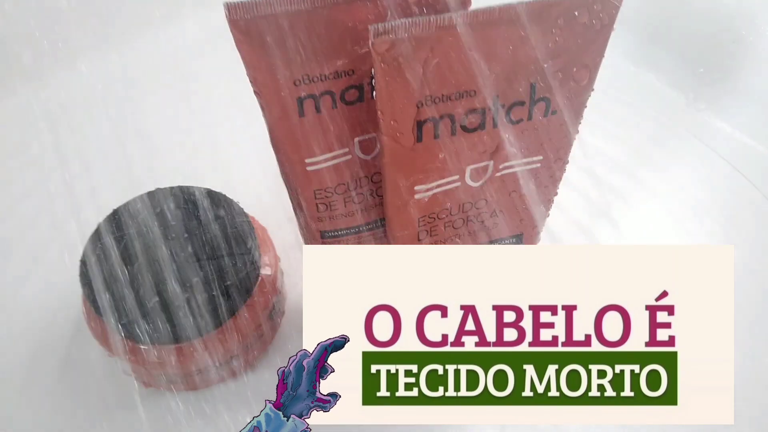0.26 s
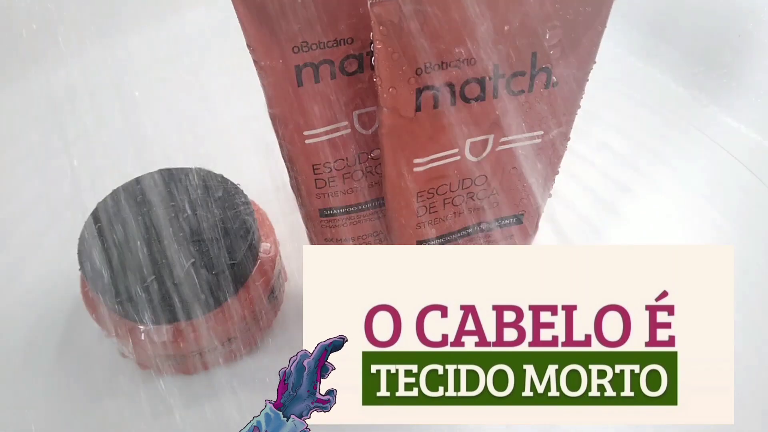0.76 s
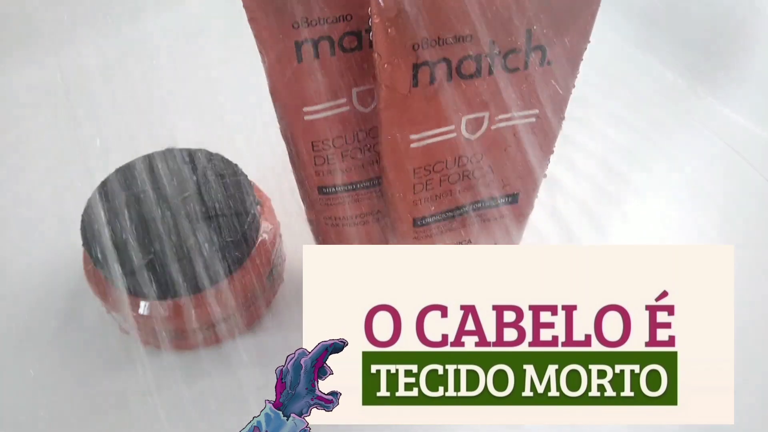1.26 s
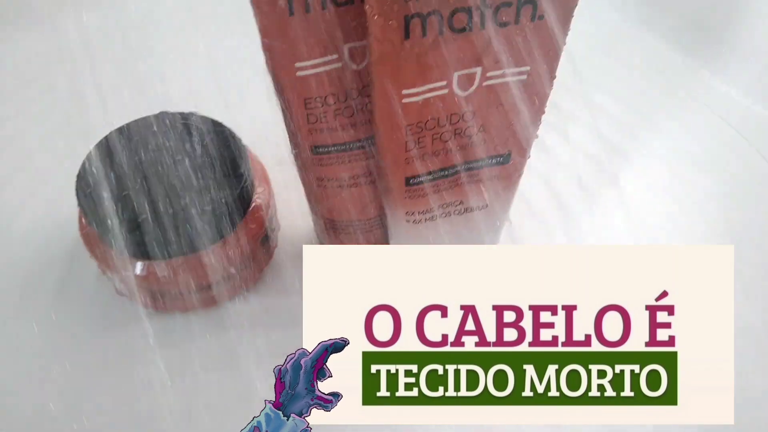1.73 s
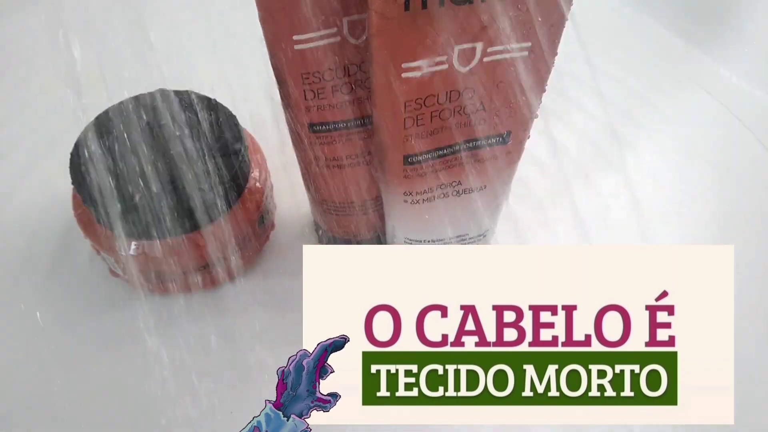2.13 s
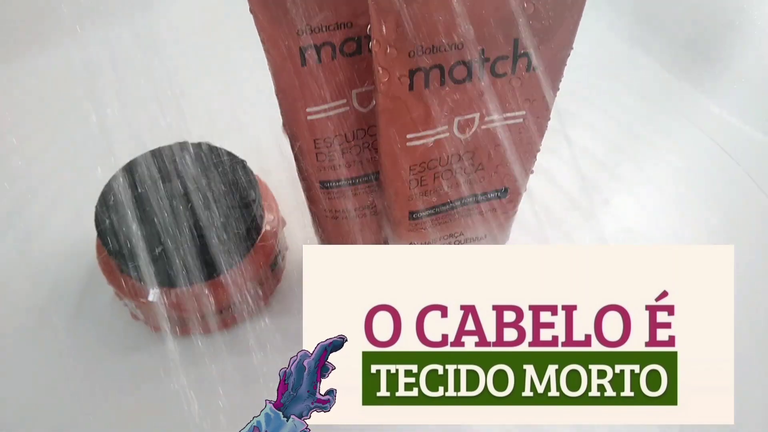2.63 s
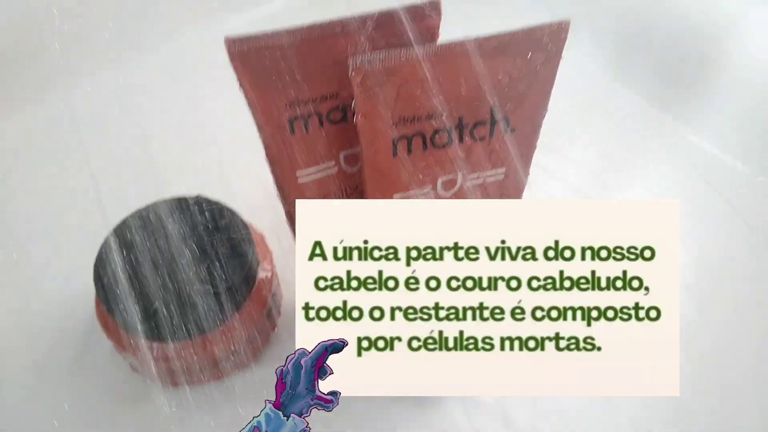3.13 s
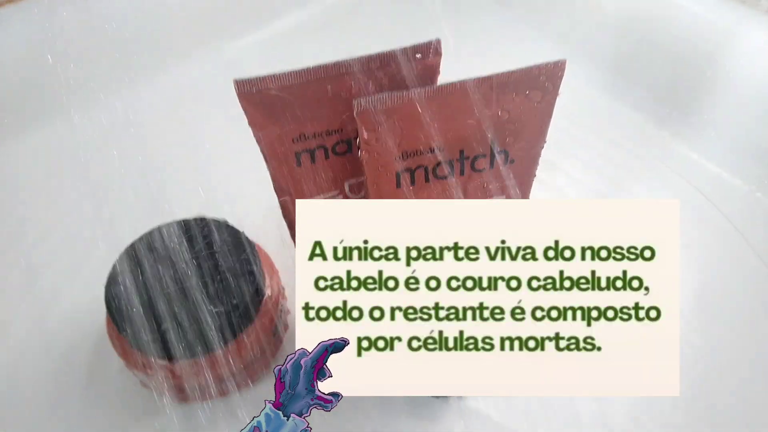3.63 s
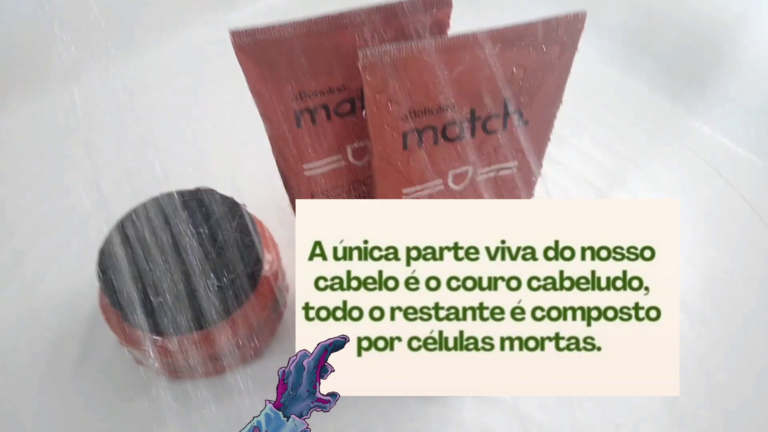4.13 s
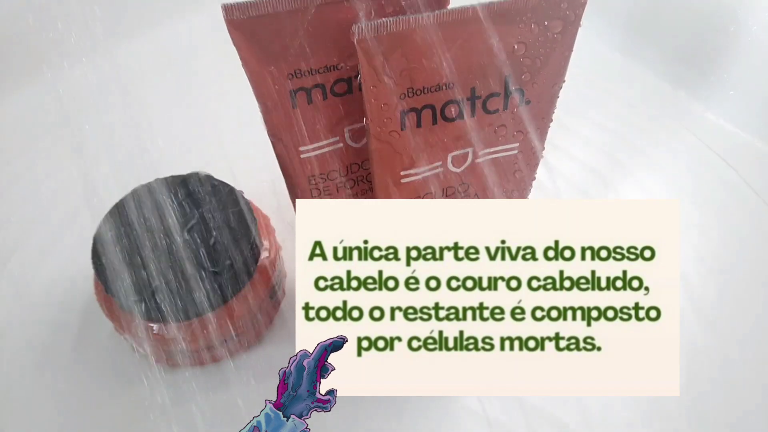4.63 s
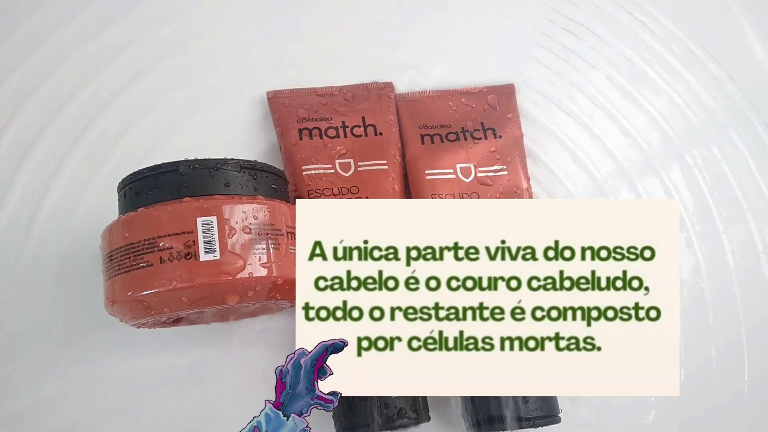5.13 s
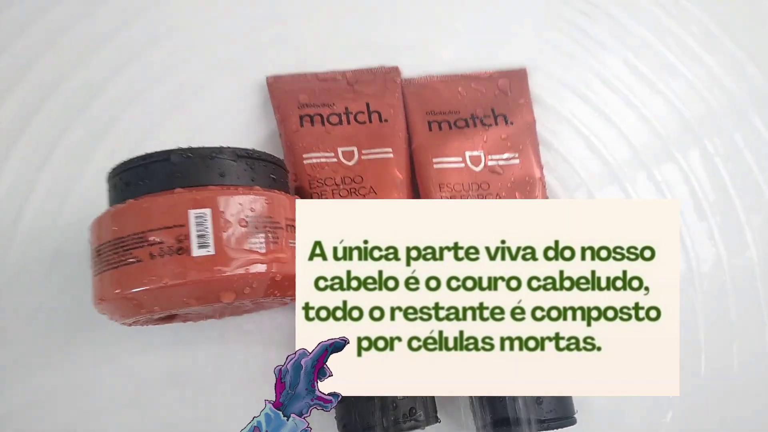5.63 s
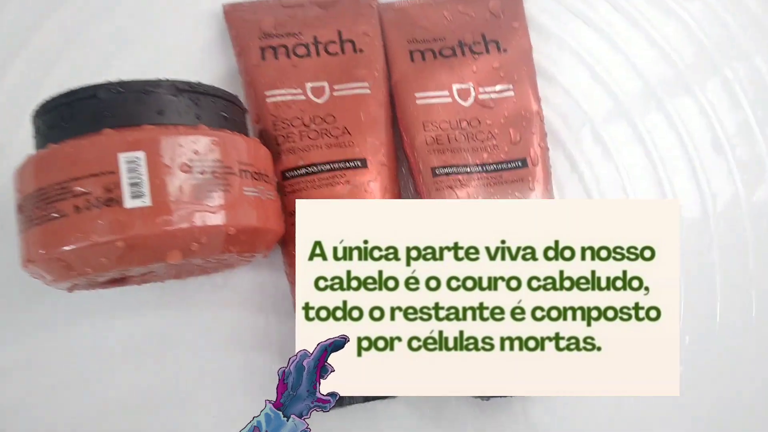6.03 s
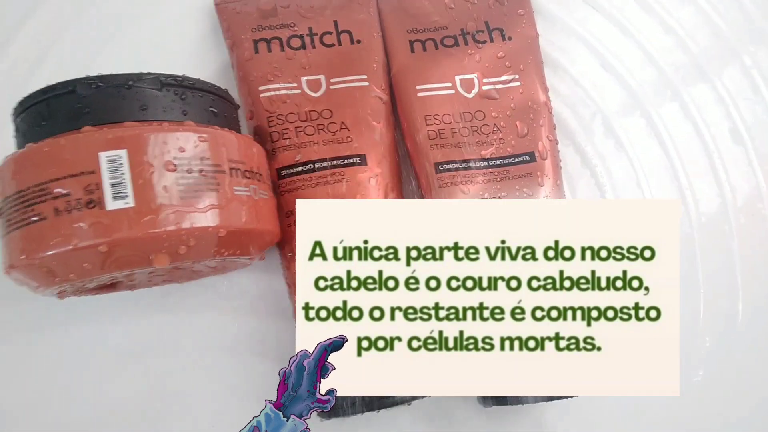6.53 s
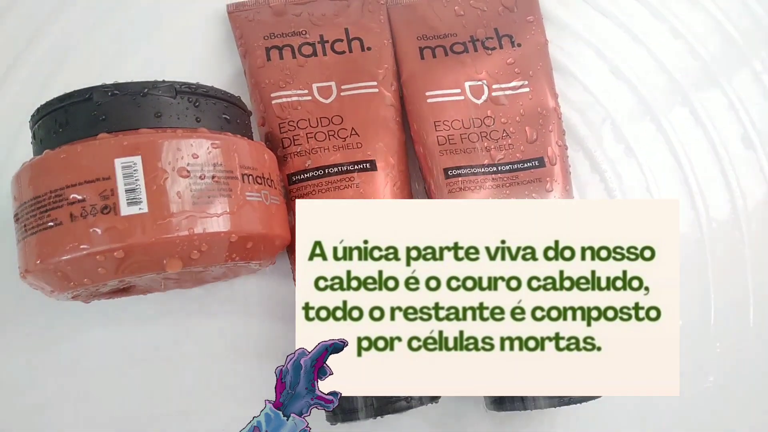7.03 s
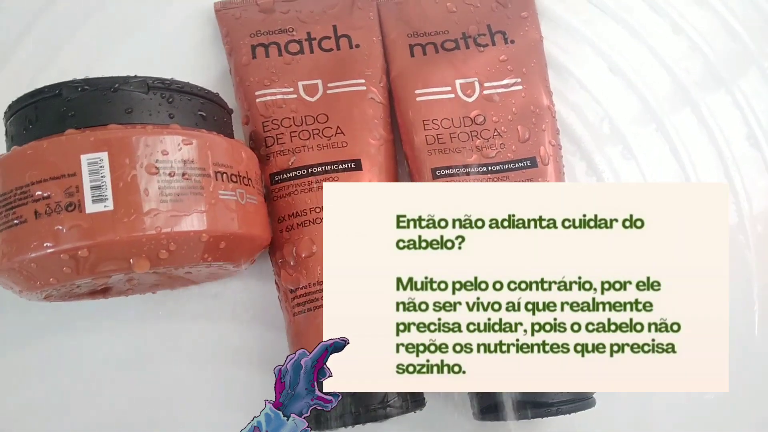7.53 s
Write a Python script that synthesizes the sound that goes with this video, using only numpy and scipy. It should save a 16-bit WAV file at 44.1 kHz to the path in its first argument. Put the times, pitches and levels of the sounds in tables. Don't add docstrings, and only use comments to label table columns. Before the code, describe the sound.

Steady near shower water with bright ticking droplets, a short dead gap, then farther high hiss fading in, sparse drips, faint hum and a soft bump.

```python
import sys
import numpy as np
from scipy import signal
from scipy.fft import rfft, irfft, next_fast_len
from scipy.io import wavfile
from scipy.ndimage import uniform_filter1d, map_coordinates

SR = 44100
rng = np.random.default_rng(int(sys.argv[2]) if len(sys.argv) > 2 else 0)


def ratio(d):
    e = np.asarray(d, float) / 20
    return 10 ** e


def dump(signal):
    limited = np.clip(np.atleast_2d(signal).T, -1, 1)
    pcm = np.round(limited * 32767).astype(np.int16)
    wavfile.write(sys.argv[1], SR, pcm)


N = 342216
TIME = np.arange(N) / SR
STOP_S, START_S = 4.8345, 5.1922
PORTS = np.array([[1], [-1]])

# (t/s, peak level/dB, f/Hz, splash level/dB)
SMALL_DROPS = [(0.025, -29.5, 7640, -13), (0.1277, -25.5, 7760, -6), (0.2488, -26, 7600, -6.5),
               (0.2985, -23, 7170, -6), (0.3723, -19, 7870, -4.5), (0.4471, -24.5, 7660, -15),
               (0.318, -32, 7200, -14.5), (0.615, -34.5, 7400, -14), (2.066, -32, 6800, -15),
               (2.129, -38.5, 6000, -12), (3.074, -35, 7200, -14.5), (0.6943, -22.5, 7350, -9),
               (0.756, -30.5, 7660, -12.5), (1.0648, -32, 7340, -11), (1.5828, -36, 7700, -3.5),
               (1.705, -32.5, 5260, -21), (1.722, -34, 7260, -10), (1.758, -30.5, 7800, -8.5),
               (1.893, -27, 7000, -12), (1.917, -28, 6670, -3), (2.0322, -25, 8300, -11),
               (2.2426, -34, 7260, -8), (2.67, -32.5, 8600, -20), (2.706, -33.5, 7700, -15),
               (2.737, -24, 7770, -7), (2.983, -36.5, 6860, -7), (3.447, -27.5, 7300, -14.5),
               (3.465, -29, 6300, 4), (3.4655, -24, 5370, -11), (3.4667, -34, 9370, -7),
               (3.4657, -35, 4500, -8), (3.4706, -27.5, 7000, -4.5), (0.377, -28.5, 6900, -9),
               (3.479, -34, 5600, -9), (3.5952, -29.5, 7600, -9), (3.705, -33.5, 7350, -12.5),
               (4.047, -31.5, 6600, -11), (4.0696, -34.5, 6600, -12), (4.4533, -30, 8120, -12),
               (4.472, -30, 7050, -9), (4.813, -31, 7600, -6.5)]
# (t/s, peak level/dB, f/Hz)
PUDDLE_PLINKS = [(0.1211, -40, 2150), (0.1665, -34, 3300), (0.7731, -39, 3440), (0.8138, -28.5, 2070),
                 (0.977, -32, 2650), (1.0171, -33, 2800), (1.1075, -34, 2880), (1.3718, -36.5, 2400),
                 (1.6771, -31.5, 2900), (2.0136, -34.5, 2110), (2.0911, -36, 3070), (2.2, -29.5, 1980),
                 (2.3215, -32.5, 2730), (2.387, -38, 3470), (2.4284, -38, 2900), (2.7302, -37, 3360),
                 (3.0994, -38.5, 3000), (3.1497, -35, 2040), (3.3912, -36, 3390), (3.4635, -39.5, 4260),
                 (3.5189, -32, 1890), (3.703, -37, 2640), (3.9584, -35, 3070), (4.4887, -34, 3120)]
# (t/s, peak level/dB, f/Hz)
LATE_DRIPS = [(5.221, -53, 4640), (5.415, -40.5, 1610), (5.416, -40, 2700), (5.419, -51, 1080),
              (5.4522, -39.5, 5800), (5.6557, -44, 7050), (5.911, -45, 2510), (5.946, -40.5, 4440),
              (6.107, -30.5, 4000), (6.37, -54, 2870), (6.434, -39.5, 6250), (6.484, -37.5, 7240),
              (6.669, -39, 6100), (6.798, -29.5, 6750), (6.932, -40, 6470), (7.1768, -31.5, 4280),
              (7.275, -41, 2990), (7.353, -44, 2717), (7.4555, -50, 3580), (7.469, -33, 7600),
              (7.498, -44, 3820), (7.5316, -41, 3700), (7.6266, -50, 6000), (7.673, -35.5, 7540)]
# (t/s, peak level/dB, f/Hz)
LATE_BUBBLES = [(5.96, -35, 3080), (6.6325, -32.5, 3040), (5.93, -42, 2470), (6.6994, -41, 3770),
                (6.7838, -33, 3740), (7.1606, -39, 2830), (7.6266, -41, 3100), (7.633, -43, 2500),
                (7.716, -56, 5200), (7.354, -52, 5000), (6.367, -55, 6500)]
# (t/s, peak level/dB, left-right level/dB)
FINE_SPLASHES = [(0.105, -39, -3), (0.1965, -36.5, -2.5), (0.347, -33, -2), (0.56, -40.5, -2),
                 (0.641, -37, 1.5), (0.894, -40.5, 3), (0.991, -35.5, -1), (1.1237, -35, 1),
                 (1.2146, -39.5, -5), (1.456, -33.5, -1), (1.6846, -42, -8.5), (1.838, -41, -2.5),
                 (1.9325, -44, -6), (2.143, -42.5, -6), (2.384, -40.5, 5), (2.415, -33.5, 2),
                 (2.431, -40, 0), (2.495, -34, -0.5), (2.61, -35, 2), (3.1167, -33, -2), (3.312, -36.5, 0),
                 (3.519, -43.5, 8), (3.6436, -39, -4), (3.7075, -32, 0), (4.0991, -44.5, -8),
                 (4.3098, -38, -3.5), (4.4107, -42, -3.5), (4.56, -44.5, 1), (6.513, -40, -4),
                 (6.6278, -41, -2)]
# (t/s, peak level/dB, left-right level/dB)
FAINT_SPLASHES = [(0.0334, -33.5, 0), (0.3174, -53, -4.5), (0.6269, -51, -3), (0.7725, -49, -2.0),
                  (0.794, -44, -4.0), (0.8139, -42, 2), (0.8788, -49, -1), (0.9347, -40, -1),
                  (1.0389, -43, -1), (1.1068, -43, 4), (1.3328, -52, -6.5), (1.3457, -46, -10),
                  (1.4385, -44, 0), (1.5822, -33, -3.5), (1.6705, -39, -1), (2.2412, -33, -1),
                  (2.352, -40, -1), (2.562, -47, -4), (2.5969, -43, -5), (2.7047, -29, 0),
                  (2.8378, -45, -5), (2.9326, -47, -5.5), (3.0125, -43, -3), (3.0598, -47, -4.5),
                  (3.0988, -41, -2), (3.1324, -39, -5.0), (3.1474, -44, 0), (3.3726, -48, -7),
                  (3.4076, -43, 3), (3.4415, -30.5, 3), (3.5572, -42, -1), (3.7827, -47, -4.5),
                  (3.8012, -48.5, -5.5), (3.8635, -46.5, -6), (3.9563, -50, -1.5), (3.9708, -42, -8.0),
                  (4.0082, -49.5, -7), (4.0361, -40.5, -6.0), (4.069, -31, -6), (4.1703, -49, -6.5),
                  (4.2646, -41, -4), (4.5056, -40.5, -7), (4.54, -42.5, -5), (4.5899, -39.5, 3.5),
                  (4.7021, -50, -5.0), (5.9184, -52, -4.5), (6.1005, -47, -2), (6.315, -47, -5),
                  (6.4837, -45, -7), (6.8044, -50, -3), (6.9441, -47.5, -6), (7.1402, -42, -9),
                  (7.2614, -52, -7), (7.414, -43, -4.5)]
# (t/s, peak level/dB, left-right level/dB)
BURSTING_DROPLETS = [(0.2014, -44, 5), (0.2957, -44.5, 1.0), (0.3466, -41.5, 8), (0.3711, -49.5, 3.0),
                     (0.4579, -42, 5.5), (0.5611, -51, 4.5), (0.6275, -46.5, 1.5), (0.7736, -42.5, 4.5),
                     (0.8804, -49.5, 1), (0.8934, -39, 2.5), (0.9812, -44, 0.5), (1.0331, -49.5, 3),
                     (1.1228, -42.5, 1), (1.1648, -41.5, 1), (1.2072, -45, 3), (1.3334, -43, 0.5),
                     (1.4401, -50, 2), (1.4551, -45.5, 1), (1.5589, -49, 3.5), (1.5828, -49, 4.0),
                     (1.6696, -50.5, 2.0), (1.7564, -45, 0), (1.7814, -40, 2), (1.8696, -47, 3.0),
                     (1.917, -52.5, 2.0), (2.0328, -39.5, 4.5), (2.2428, -46, 3), (2.3531, -52, 1.0),
                     (2.3835, -47.5, 1), (2.4144, -36.5, 3.5), (2.4314, -43, 1), (2.4947, -44.5, 1.5),
                     (2.597, -47.5, 1.5), (2.6918, -54, 1.5), (2.7053, -47, -1.0), (2.7581, -52, 2),
                     (2.9497, -49, 3.0), (3.0994, -46, 0.5), (3.1168, -45.5, -1.5), (3.1637, -46.5, 6.5),
                     (3.311, -40, 2), (3.3742, -47, 5.5), (3.4979, -50.5, 5), (3.5184, -45, 4.0),
                     (3.6282, -51, 5), (3.707, -35.5, 3), (3.8043, -50, 4.0), (3.8641, -46, 7),
                     (4.0497, -50.5, 1), (4.0701, -49, 0.5), (4.1574, -51.5, 5), (4.1739, -50, 6.5),
                     (4.2652, -44, -1), (4.3091, -39.5, -1), (4.4543, -43, 6), (4.5401, -47.5, 3),
                     (4.5605, -44, 10), (4.5905, -46, 7), (6.6268, -50, 0), (7.2609, -47.5, 2)]
# (f/Hz, level/dB)
SPLASH_COLOUR = [(4000, -31.5), (7000, -3), (10000, 4), (12000, -2), (15000, -14.5)]
# (f/Hz, level/dB)
DROPLET_COLOUR = [(8000, -32.5), (11500, -1), (14000, -3.5), (16000, -2)]
TUB_MODE_HZ = [135, 210, 240, 283, 385, 420, 458, 508, 590, 640, 695, 905, 1108, 1550]
# (width/Hz, level/dB)
TUB_MODE_SHAPE = [(24.7, -17), (14.94, -7.5), (25, -11), (23.1, -10.5), (24.6, -4), (22, -1), (21.6, 3),
                  (31.7, -2), (30.5, -3.5), (29.8, -3.5), (34.6, -10), (49.6, -17.5), (50.7, -13.5),
                  (100, -34)]
# (t/s, level/dB)
TUB_BEATING = [
    (0, -43.5),
    (1.0, -43.5),
    (1.32, -42.5),
    (1.93, -45),
    (2.1, -43),
    (3.25, -46),
    (3.68, -43.5),
    (4.11, -46),
    (4.6, -44),
]
# (f/Hz, width/Hz, level/dB)
CORNER_AIR = [(1770, 90, -3), (2050, 50, -2), (2700, 90, 1), (2875, 90, 3), (3410, 80, 2)]
# (f/Hz, width/Hz, level/dB)
NOZZLE_MODES = [(280, 60, 5), (2370, 30, 4), (2690, 120, 0), (3660, 150, 1), (4250, 70, 3), (5810, 45, 4),
                (6300, 150, 3), (7200, 300, 5), (7790, 120, 7),
                (9290, 130, 4), (9815, 28, 13), (10930, 150, 5), (14100, 150, 5), (15100, 75, 2)]
# (f/Hz, level/dB)
NEAR_SPECTRUM = [(160, -12), (320, -6), (800, -3.5), (3000, -4.5), (4300, -3.5), (5200, -6), (8000, -7),
                 (16000, -11.5)]
# (f/Hz, level/dB)
FAR_SPECTRUM = [(200, -12), (300, -19), (500, -15), (1200, -22), (1600, -19.5), (2400, -12), (4000, -15),
                (5000, -14), (7400, -8), (9000, -3), (11500, -9.5), (14000, -14.5)]
# (t/s, low level/dB, high level/dB)
NOZZLE_RIDGES = [
    (5.2, -1.5, -11),
    (5.45, -0.5, -4.5),
    (6.0, -5.5, -9),
    (6.4, -11, -7),
    (7.0, -13, -8),
    (7.76, -22, -1.5),
]
# (f/Hz, level/dB)
AIR_RUMBLE = [(3, -2.8), (10, -3.5), (22, -14.5), (60, -17.5), (150, -28), (300, -30), (600, -45),
              (1500, -49.5)]
# (f/Hz, t60/s)
TILE_DECAY = [(200, 0.24), (2000, 0.29), (8000, 0.098), (15000, 0.15)]
# (level/dB, starting f/Hz, t60/s)
CASE_BUMP = (-37.5, 275, 0.045)
# (f/Hz, level/dB)
LEFT_RESPONSE = [(800, -1.2), (1300, -2), (1600, 5.5), (2000, -0.5), (2800, 8), (3500, 7), (5000, -1.5),
                 (6000, -1), (7400, 4.5), (8500, -3.5), (10500, -17), (13000, -12), (15500, -9)]
# (f/Hz, level/dB)
RIGHT_RESPONSE = [(800, -1), (1300, -2.5), (1650, 1.5), (1900, 1), (2100, 1), (3000, -4), (5000, -6.5),
                  (6500, -13), (8000, -12), (9700, -6), (11000, -8.5), (13000, -19.5), (14300, -10.5),
                  (15600, -25.5)]
# (t/s, offset/full scale)
INPUT_DRIFT = [(5.1925, 0.0034), (5.22, 0.012), (5.28, 0.015), (5.36, 0.013), (5.42, 0.0024),
               (5.55, 0.0025)]
# (t/s, step/full scale)
INPUT_STEPS = [(5.2017, -0.00083), (5.2107, -0.0016), (5.221, -0.00046), (5.235, -0.0011), (5.2463, 0.0012),
               (5.259, -0.00096), (5.273, -0.0022), (5.287, 0.0028), (5.302, -0.0039)]


def unit(x):
    return x / np.sqrt(np.mean(x ** 2) + 1e-20)


def along(points, hz):
    f, value = np.transpose(points)
    return np.interp(np.log(hz + 1), np.log(f + 1), value)


def curves(rows):
    s, *columns = np.transpose(rows)
    return [np.interp(TIME, s, column) for column in columns]


def wobble(rate):
    knots = rng.standard_normal(int(N * rate / SR) + 4)
    return map_coordinates(knots, [TIME * rate])


def filtered(x, response):
    m = next_fast_len(N + SR // 2, True)
    return irfft(rfft(x, m) * response(np.fft.rfftfreq(m, 1 / SR)), m)[..., :N]


def causal(points):
    cepstrum = irfft(np.log(ratio(along(points, np.fft.rfftfreq(4096, 1 / SR)))))
    cepstrum[1:2048] *= 2
    cepstrum[2049:] = 0
    return irfft(np.exp(rfft(cepstrum)))


def coloured(x, points):
    return signal.fftconvolve(x, causal(points)[None], axes=1)[:, :N]


def modes(table):
    def response(f):
        total = 0
        for k, (centre, width, db) in enumerate(table):
            total = total + (-1) ** k * ratio(db) * 1j * f * width / (centre ** 2 - f * f + 1j * f * width)
        return total
    return response


def port_lag(lag_s):
    return lambda f: np.exp(-1j * np.pi * f * lag_s * PORTS)


def impacts(rate, spread_db):
    chance, size, sign = rng.random((3, N))
    strength = ratio(-spread_db * np.log(size + 1 / 40))
    return unit((chance < rate / SR) * strength * np.sign(sign - 0.5))


def room(x, wet_db, lag_s):
    hz, t, z = signal.stft(rng.standard_normal((2, SR // 3)), SR, nperseg=256)
    decay = ratio(-60 * t / along(TILE_DECAY, hz)[:, None])
    tail = signal.istft(z * decay, SR, nperseg=256)[1]
    tail = tail / np.linalg.norm(tail[0])
    wet = signal.fftconvolve(np.atleast_2d(x), tail, axes=1)[:, :N]
    return filtered(x, port_lag(lag_s)) + ratio(wet_db) * np.roll(wet, SR // 500)


def spray(spectrum, resonances, ring_db, grain_db, patchy_db):
    z = signal.stft(rng.standard_normal((3, N)), nperseg=512)[2]
    patches = uniform_filter1d(rng.standard_normal(z.shape[1:]), 8, 0)
    patches = unit(uniform_filter1d(patches, 6, 1))
    noise = signal.istft(z * ratio(patchy_db * patches), nperseg=512)[1]
    common, *apart = unit(noise[:, :N])

    def turn(hz):
        return np.arctan((hz / 1490) ** 2)

    mist = filtered(common, lambda hz: np.cos(turn(hz)) * port_lag(0.00024)(hz))
    mist = mist + filtered(np.array(apart), lambda hz: np.sin(turn(hz)))
    patter = room(impacts(900, 3.5), wet_db=-4, lag_s=0.00015)

    def colour(hz):
        ring = 1 + ratio(ring_db) * np.abs(modes(resonances)(hz))
        return ratio(along(spectrum, hz)) * ring

    return filtered(mist + ratio(grain_db) * patter, colour)


def drumming(level_db):
    blur = filtered(rng.standard_normal((2, N)), lambda hz: ratio(-4.5) * hz / np.hypot(hz, 400))
    strikes = filtered(impacts(700, 1.6), port_lag(0.00011))
    beat = filtered(strikes + blur, modes(np.column_stack([TUB_MODE_HZ, TUB_MODE_SHAPE])))
    return ratio(level_db + 0.5 + 0.77 * wobble(7.2)) * unit(beat)


def drops(rows, lean_db, wet_db):
    out, t = np.zeros((2, N + SR)), np.arange(SR // 25) / SR
    scatters = rng.standard_normal((len(rows), 14))
    for (s, db, hz, splash_db, t60_s), scatter in zip(rows, scatters):
        bubble = np.sin(2 * np.pi * hz * t * (0.982 + 6 * t)) * ratio(-60 * t / t60_s)
        ceiling_hz = 11500 - 600 * np.abs(scatter)
        nearby_hz = np.minimum(hz * ratio(2.4 * np.abs(scatter) - 2), ceiling_hz)
        splash = np.sin(2 * np.pi * np.outer(nearby_hz, t) + 9 * scatter[:, None]).sum(0)
        splash = splash * np.exp(-t * 1000) * (1 - np.exp(-t * 4000))
        onset = 1 - np.exp(-t * hz / 0.66)
        source_db = db + 5 - along(LEFT_RESPONSE, hz) + lean_db / 2 * PORTS
        start = round(s * SR)
        out[:, start:start + len(t)] += ratio(source_db) * (bubble + ratio(splash_db) * splash) * onset
    return room(out[:, :N], wet_db=wet_db, lag_s=0.00019)


def fizz(rate, level_db):
    t = np.arange(SR // 100) / SR
    swell = signal.fftconvolve(np.abs(impacts(rate, 5.5)), ratio(-60 * t / 0.0083))[:N]
    clumps = unit(swell * ratio(7.4 * wobble(22))) * rng.standard_normal((2, N))
    return ratio(level_db) * coloured(clumps, SPLASH_COLOUR)


def near_shower():
    spray_db = -47 - 0.3752 * TIME
    jets = spray(NEAR_SPECTRUM, CORNER_AIR, ring_db=-7.5, grain_db=-5, patchy_db=3.0)
    jets = ratio(spray_db + 12 + 0.25 * wobble(17)) * jets
    tick_t60_s = 0.0077
    ticks = []
    for s, db, hz, splash_db in SMALL_DROPS:
        longer = ratio(0.24 * (splash_db + 17.5))
        ticks.append((s, db, hz, splash_db, tick_t60_s * longer))
    ticks += [(s, db - 2, 7340, -10, tick_t60_s) for s, db, _ in FINE_SPLASHES]
    plinks = [(*row, -16.5, 0.016) for row in PUDDLE_PLINKS]
    small = drops(ticks, lean_db=-3.0, wet_db=-6.5)
    large = drops(plinks, lean_db=4.0, wet_db=-9.0)
    return jets + drumming(curves(TUB_BEATING)[0] + 1.0) + small + large + fizz(180, level_db=-51.5)


def bursts(rows, colour, t60_s):
    out, t = np.zeros((2, N + SR)), np.arange(SR // 50) / SR
    noises = rng.standard_normal((len(rows), len(t)))
    for (s, db, pan_db), noise in zip(rows, noises):
        burst = unit(noise * ratio(-60 * t / t60_s) * (1 - np.exp(-t / 0.00053)))
        start = round(s * SR)
        out[:, start:start + len(t)] += ratio(db + 15.5 + pan_db / 2 * PORTS) * 0.18 * burst
    return coloured(out, colour)


def fine_splashes():
    rows = FINE_SPLASHES + [(s, db - 11, 2) for s, db, *_ in SMALL_DROPS]
    rows = rows + [(s + 0.0007, db - 2, pan_db) for s, db, pan_db in FAINT_SPLASHES]
    droplets = [(s, db + 4, pan_db) for s, db, pan_db in BURSTING_DROPLETS]
    dry_bursts = bursts(rows, SPLASH_COLOUR, 0.0067) + bursts(droplets, DROPLET_COLOUR, 0.012)
    return room(dry_bursts, wet_db=-2.0, lag_s=0.00017)


def rumble():
    shared, left, right = rng.standard_normal((3, N))
    air = np.array([left, right]) + 0.77 * shared
    air = filtered(air, lambda hz: ratio(along(AIR_RUMBLE, hz)))
    return ratio(-49.5 + 1.1 * wobble(7.2)) * unit(air)


def fade_in():
    return np.clip(0.037 + (TIME - START_S) / 0.32, 0, 1)


def nozzle():
    def ridge(hz, width_hz):
        narrow = modes([(hz, width_hz, 0)])
        return unit(filtered(rng.standard_normal((2, N)), lambda f: narrow(f) ** 2))

    low_db, high_db = curves(NOZZLE_RIDGES)
    low = ratio(low_db + 2.6 * wobble(14)) * ridge(7200, 380)
    high = ratio(high_db + 3.4 * wobble(14)) * ridge(7750, 330)
    whistle = ratio(-15.0 + 2.35 * wobble(12)) * ridge(9815, 60)
    return ratio(-7.5) * (low + high) + whistle


def far_shower():
    jets = spray(FAR_SPECTRUM, NOZZLE_MODES, ring_db=0.1, grain_db=-2.5, patchy_db=2.5)
    jets = jets + fizz(30, level_db=-24) + nozzle()
    drips = [(s, db, hz, -14 + 0.3 * (db + 40), 0.01) for s, db, hz in LATE_DRIPS]
    drips += [(*row, -22, 0.015) for row in LATE_BUBBLES]
    jets_db = -48.5 + 7.5 + 0.31 * wobble(9.4)
    return ratio(jets_db) * fade_in() * jets + drops(drips, lean_db=6.0, wet_db=-7.5)


def hum():
    tone = np.sin(2 * np.pi * 99.5 * TIME + 0.84 * wobble(5.4))
    return ratio(np.array([[4], [-1.5]])) * ratio(-65 + 4.5 * wobble(5)) * tone


def case_bump():
    db, hz, t60_s = CASE_BUMP
    t = np.maximum(TIME - 7.1228, 0)
    return ratio(db - 60 * t / t60_s) * np.sin(2 * np.pi * hz * 0.0042 * np.log(1 + t / 0.0049))


def scene():
    before = TIME < STOP_S
    after = far_shower() + (hum() + case_bump()) * fade_in()
    air_gain = np.where(before, 1, ratio(-1.5) * fade_in())
    return np.where(before, near_shower(), after) + fine_splashes() + rumble() * air_gain


def band_limit(x):
    return signal.sosfilt(signal.butter(12, 17000, fs=SR, output="sos"), x)


def record(dry):
    ports = np.array([causal(LEFT_RESPONSE), causal(RIGHT_RESPONSE)])
    heard = signal.fftconvolve(dry, ports, axes=1)[:, :N]
    heard = filtered(heard, lambda hz: np.where(hz < 15760, 1, 0))
    offset = curves(INPUT_DRIFT)[0] + sum(size * (TIME > s) for s, size in INPUT_STEPS)
    offset = filtered(offset * (TIME > START_S), lambda hz: 1 / (1 + 1j * hz / 7000) ** 4)
    running = (TIME < STOP_S) | (TIME > START_S)
    return band_limit(heard * running + offset)


dry = scene()
out = record(dry)
dump(out)
```